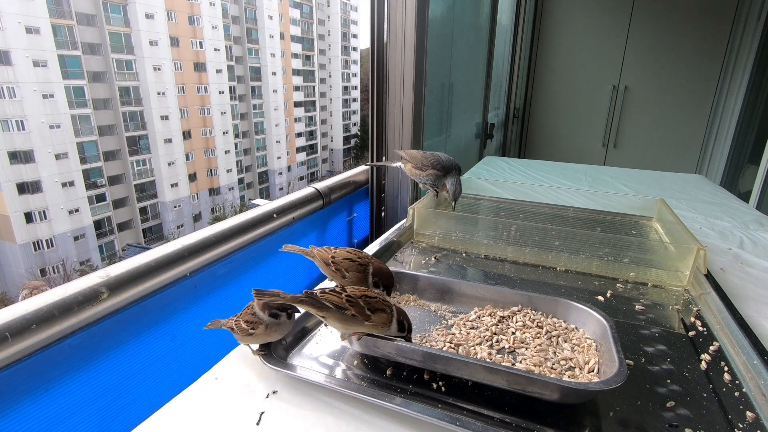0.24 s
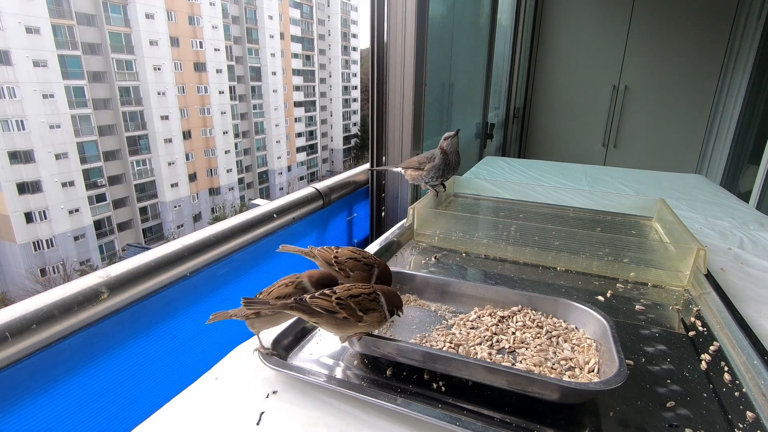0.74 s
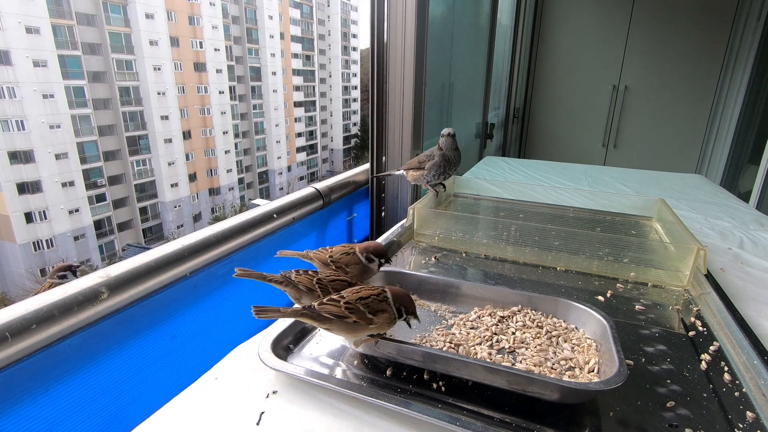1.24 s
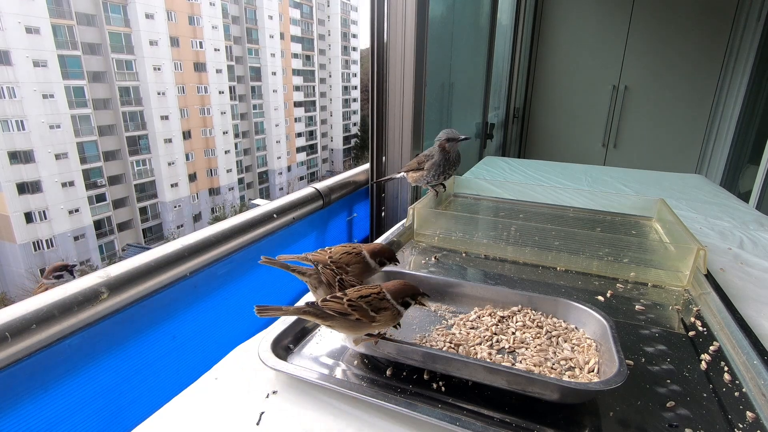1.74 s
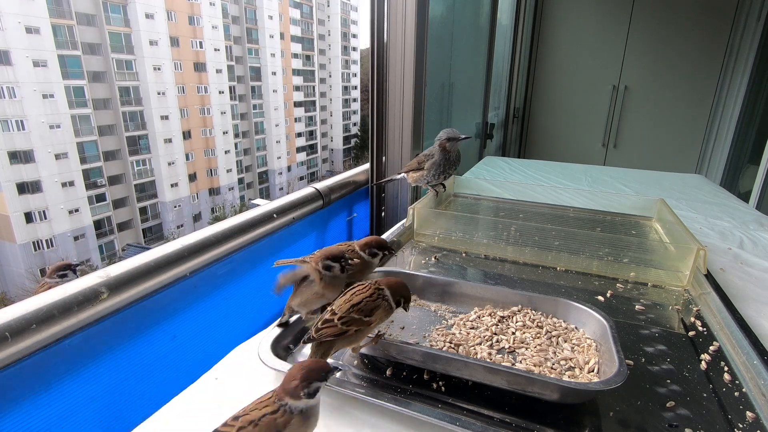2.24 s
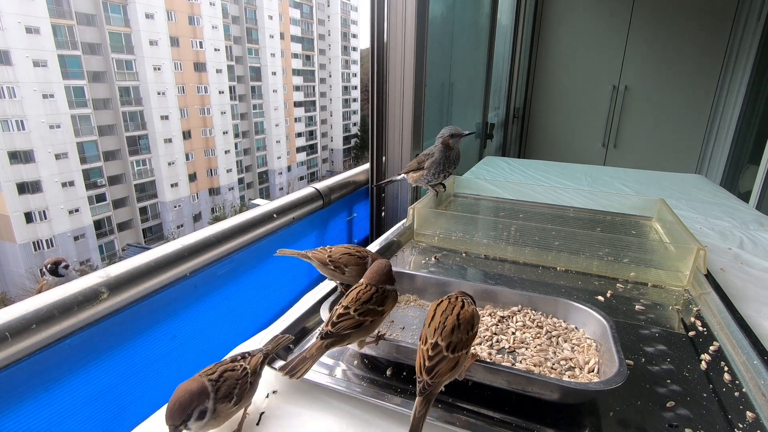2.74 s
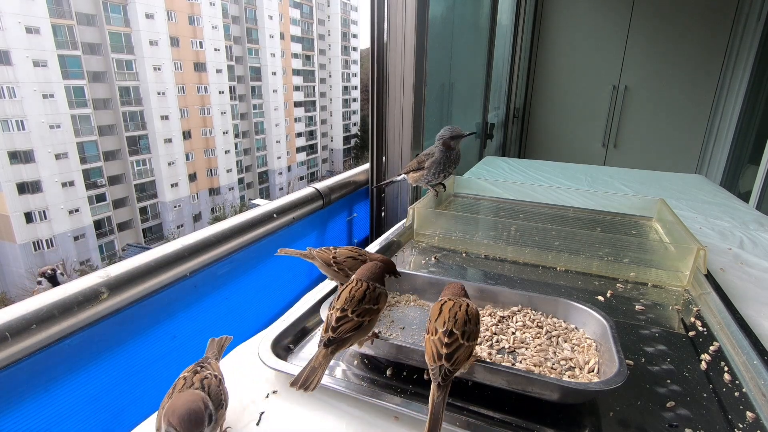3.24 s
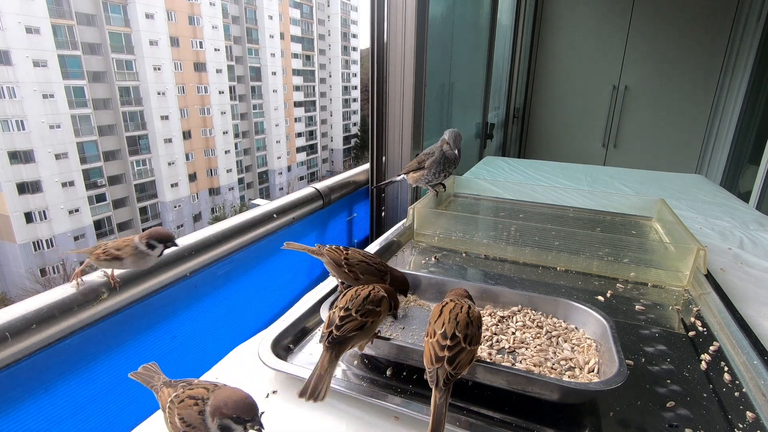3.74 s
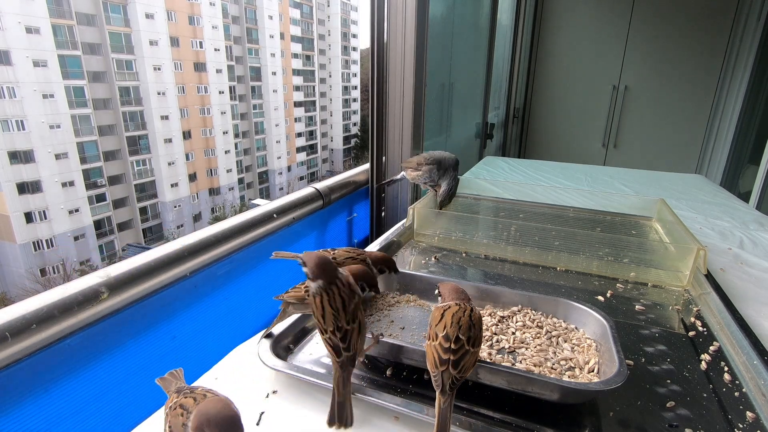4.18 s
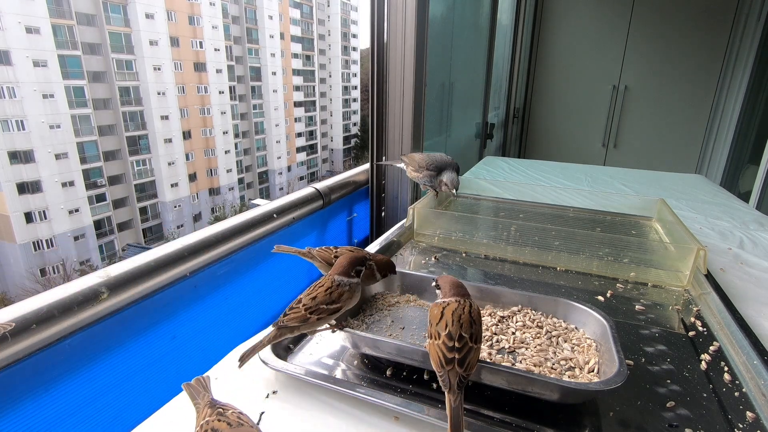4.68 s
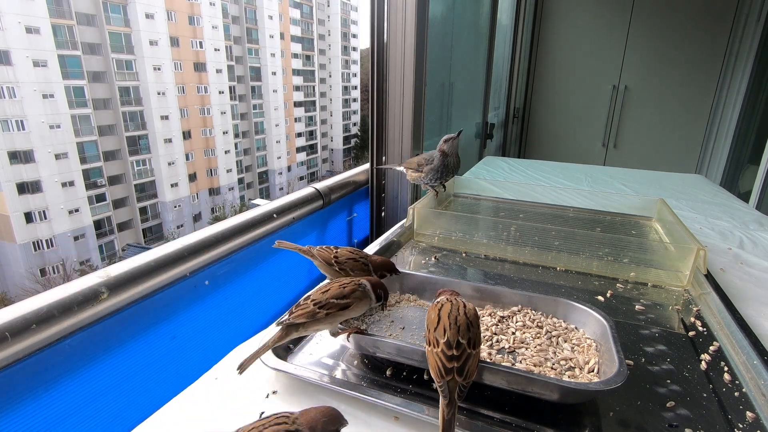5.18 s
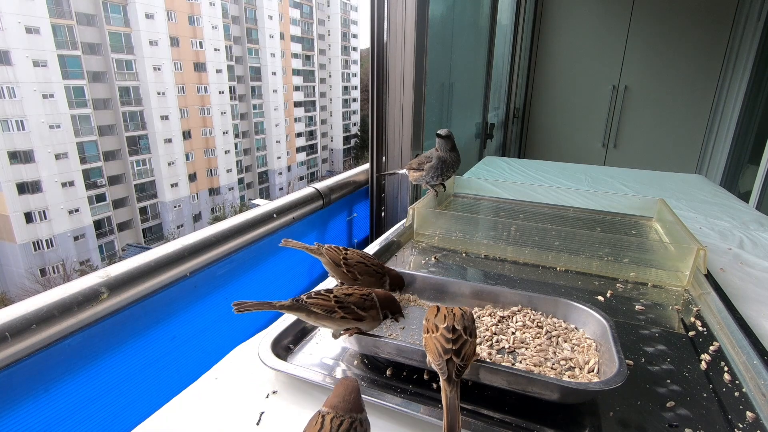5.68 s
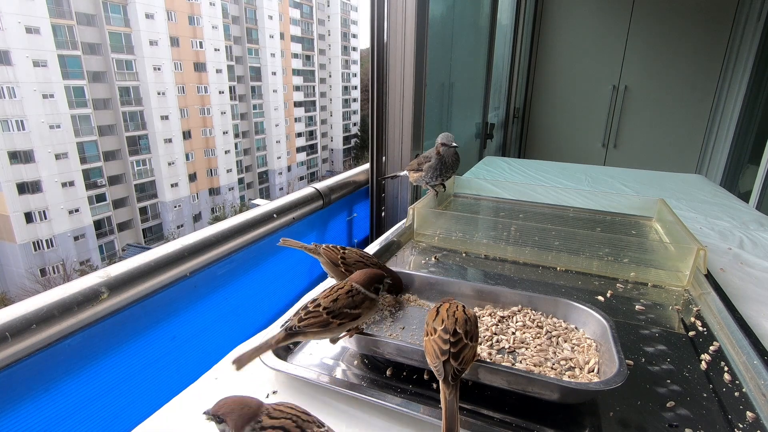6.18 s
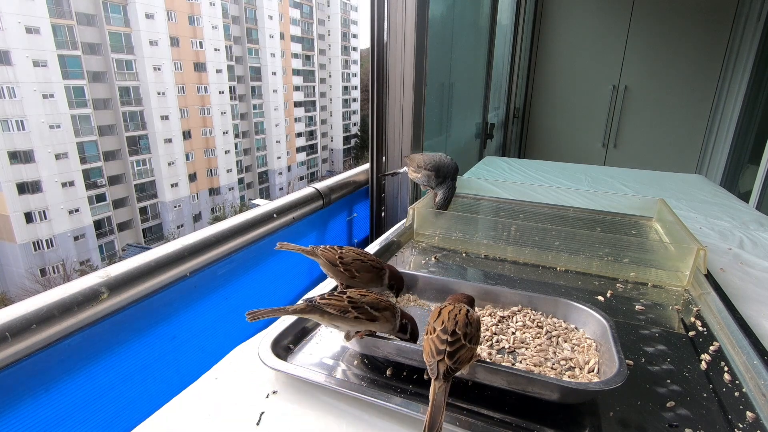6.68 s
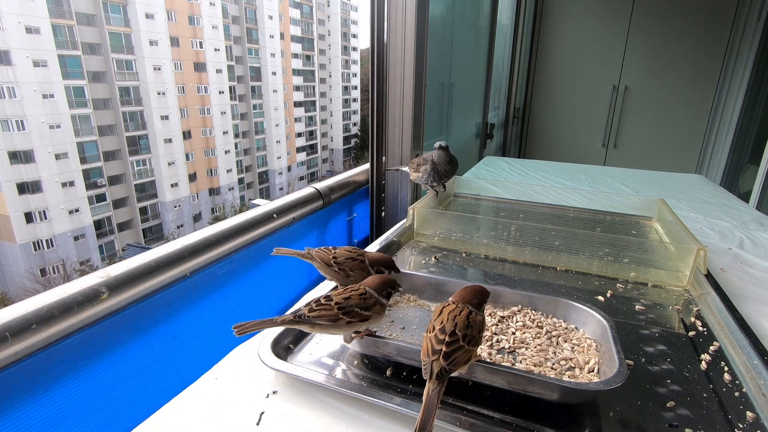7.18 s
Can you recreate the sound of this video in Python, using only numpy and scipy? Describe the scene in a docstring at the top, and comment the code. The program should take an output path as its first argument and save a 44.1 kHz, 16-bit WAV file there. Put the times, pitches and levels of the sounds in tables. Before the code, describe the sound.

On a glazed balcony, beaks tick irregularly on a metal seed tray, with faint husk rustles and scuffing claws. A flutter opens the scene, a heavy hop lands around two seconds, and a brief rattling bird call follows. Around four seconds, wing puffs, scrabbling and thumps cluster, then a thin metal ring. Pecks and hops continue to the end over quiet low town noise, closely miked.

```python
"""Sparrows at a steel seed tray.

Birds feed on a glazed balcony, close to a small camera on the same shelf. Beak and claw ticks are grainy
noise through short resonances, echoed by a decaying noise tail. Hops boom as shelf modes and knock as noise;
wings puff air as short pressure swings. The rim sings in sines, one bird churrs in sine pulses, and
coloured noise makes the scuffs, the town hum and a passing drone."""
import sys
import numpy as np
from scipy import signal
from scipy.fft import rfft, irfft, next_fast_len
from scipy.io import wavfile
from scipy.ndimage import uniform_filter1d, map_coordinates

SR = 44100
rng = np.random.default_rng(int(sys.argv[2]) if len(sys.argv) > 2 else 0)


def materialize(psi):
    """Save the field psi as 16-bit PCM at rate SR to the path in sys.argv[1].

    A 1-D psi becomes a single channel; in a 2-D psi each row is a channel.
    """
    bounded = np.clip(np.atleast_2d(psi).T, -1, 1)
    quanta = np.round(bounded * 32767).astype(np.int16)
    wavfile.write(sys.argv[1], SR, quanta)


N = 327222
TIME_S = np.arange(N) / SR
SHORT_S = TIME_S[:SR]

# Clear ticks on the steel: beak strikes, plus the low knock of the landing at 4.36 s and a # claw of the
# landing near 5.96 s. Each row: time in seconds, level before panning in dB, # main resonance in Hz, second
# resonance in Hz, second against main in dB, crisp top in dB.
CLEAR_STRIKES = [(0.0014, -24, 2020, 4540, 2, -23.5), (0.1335, -29.5, 1660, 2640, 6, -32),
                 (0.298, -38.5, 2900, 2090, -8, -27), (0.3645, -38.5, 5950, 4400, 2, -25),
                 (0.4804, -29.5, 3300, 6140, 5.5, -21), (0.9273, -34, 4600, 3220, -7, -20),
                 (0.9582, -30.5, 2020, 3200, -5, -26), (1.605, -39.5, 2860, 4530, -6, -28),
                 (1.8417, -27.5, 4330, 6300, -4, -22), (2.012, -34, 1890, 6300, -2, -34),
                 (2.0248, -36.5, 1440, 1950, 8, 11), (2.0415, -32, 5700, 2300, -4, -26),
                 (2.225, -45, 1520, 3230, -2, -38), (2.542, -38.5, 1440, 2190, -2, -23),
                 (2.6, -33, 5850, 4400, -10, -18.5), (2.9181, -29, 4650, 6160, -13, -21),
                 (3.162, -43, 1820, 3050, -8, -30), (3.4503, -30, 3770, 5700, 4, -20),
                 (3.645, -39, 5600, 3540, -4, -23), (3.8322, -41, 6400, 7300, -3, -14),
                 (3.8382, -29, 5940, 4370, -13, -24), (3.8737, -38, 6000, 3180, -4, -11),
                 (3.897, -26, 3130, 3640, -11, -21), (3.905, -38, 3500, 4300, -1, -23),
                 (3.9835, -42, 3200, 5000, -10, -25), (4.114, -42, 3080, 5990, -1, -15),
                 (4.213, -40.5, 5850, 3210, -10, -5), (4.2776, -35, 5700, 3550, -2, -15),
                 (4.2955, -31.5, 1710, 3200, -3, -25), (4.3433, -23, 3230, 2670, -6, -32),
                 (4.364, -45, 630, 426, -9, -33), (4.387, -34.5, 5700, 3150, 0, -11),
                 (4.653, -39, 5570, 3800, -12, -25), (5.017, -37, 6000, 4370, -10, -18),
                 (5.3731, -29.5, 5650, 3900, -11, -28), (5.673, -42, 4700, 5930, -9, -30),
                 (5.9645, -41, 1605, 3150, -4, -48), (6.033, -43, 5760, 4030, -3, -21),
                 (6.0859, -32.5, 2940, 5700, -4.5, -17), (6.1445, -35, 5450, 3800, -2, -25),
                 (6.2354, -31, 6040, 3020, -10, -10), (6.534, -43, 3120, 5400, 15, -18),
                 (6.6373, -31, 4730, 2150, -0.5, -23), (6.717, -32, 5730, 4530, -8, -33),
                 (6.7327, -37.5, 3140, 2300, -5, -34), (6.9241, -34, 4880, 3020, -2, -23),
                 (7.0465, -37, 5900, 4040, -17, -19)]
# Hops on the shelf. Each row: time in seconds, boom in dB and knock in dB before the port gains.
SHELF_HOPS = [(0.137, -16.5, -25.5), (0.364, -24, -35), (1.59, -50, -48), (2.019, -14, -14.5),
              (2.145, -22, -35), (2.364, -26, -49), (2.545, -25.5, -41), (2.662, -22.5, -39),
              (2.823, -31, -38), (3.366, -25.5, -29), (3.878, -24.5, -28), (3.935, -15.5, -27),
              (4.23, -20.5, -27), (4.363, -16.5, -19.5), (4.966, -25.5, -30.5), (5.187, -22, -30.5),
              (5.329, -30, -32), (5.385, -23, -29), (5.959, -17.5, -19.5), (6.249, -24, -24),
              (6.328, -13.5, -16.5), (6.506, -19.5, -30), (6.538, -16, -33.5), (6.737, -15.5, -30),
              (7.104, -22.5, -29.5), (7.173, -21, -33)]
# Shelf modes. Each row: frequency in Hz, mean level in dB, t60 in seconds.
SHELF_MODES = [(88, -16, 0.3), (160.2, -12, 0.23), (176.75, -8, 0.25), (214.7, 9.5, 0.036),
               (275.4, -10, 0.11)]
# Claws sliding on the tray rim. Each row: start in seconds, ring level in dB, pitch in Hz,
# slide length in seconds, t60 of the free ring in seconds, low mode against main in dB.
RIM_SLIDES = [(1.253, -52, 6325, .045, .25, -12), (3.56, -60, 6290, .1, .4, -14),
              (4.425, -42.5, 6267, .028, .52, -22)]
# Tray modes before seed damping. Each row: frequency in Hz, mean level in dB, t60 in seconds.
TRAY_MODES = [(1565, -7, 0.19), (2110, 1.5, 0.023), (2890, -18.5, 0.12), (3220, -1, 0.045),
              (3990, -8.5, 0.088), (4700, -6.5, 0.018), (5910, 4, 0.033)]
# Notes of the churr. Each row: start in seconds, length in seconds, pulses per second, mean pitch in Hz,
# level before the throat filter in dB.
CHURR_NOTES = [(2.255, .058, 156, 1790, -43.5), (2.365, .004, 225, 1600, -39),
               (2.383, .006, 304, 1480, -34)]
# Background level. Each row: time in seconds, gain in dB.
TOWN_LEVEL = [(0.0, -25), (0.29, -34.5), (1.07, -34), (1.92, -31), (2.35, -41.5), (3.22, -38),
              (3.37, -38.5), (4.15, -33), (4.4, -39.5), (4.59, -42.5), (4.75, -42), (5.33, -37.5),
              (5.68, -40), (6.72, -34), (7.03, -36), (7.42, -35.5)]
# Noise spectra, relative. Each row: frequency in Hz, density in dB per Hz.
HUM_SPECTRUM = [(20, -9), (50, 2), (80, -8), (120, -6), (155, -1), (180, 3), (215, -2.5), (280, -8.5),
                (400, -18.5), (700, -35.5), (2000, -75.5)]
TRAFFIC_SPECTRUM = [(100, -37), (330, 5), (540, -7.5), (760, -3), (1000, -13), (1400, -10), (2300, -24.5),
                    (9000, -56.5)]
RUSTLE_SPECTRUM = [(800, -5), (2000, 3), (3300, 4), (4600, 1), (6400, 1), (8300, -8), (13000, -10),
                   (16000, -53)]
# Colour of the balcony tail. Each row: frequency in Hz, density in dB per Hz.
ECHO_SPECTRUM = [(100, -29), (1500, 1.5), (3000, -2.5), (4500, -8), (6000, 1.5), (7500, 0), (9000, -2.5),
                 (15000, -15.5)]
# Thud and clatter of the tray under a landing, relative. Each row: frequency in Hz, density in dB per Hz.
THUD_SPECTRUM = [(150, -26.5), (290, 9), (420, 3.5), (700, -5), (1050, -13.5), (1700, -10.5), (3000, -20),
                 (7500, -29.5), (12000, -63)]
# Feet and feathers scuffing over seeds and steel. Each row: start in seconds, level in dB, centre in Hz,
# loss in dB per octave off centre (up to two octaves), fade time constant in seconds.
SCUFF_EVENTS = [(0.0, -43.5, 3500, 10, 0.052), (0.142, -52.5, 2720, 39, 0.2), (0.705, -41, 3000, 2, 0.087),
                (0.862, -48, 4900, 0.5, 0.1), (1.70, -49, 6700, 14, 0.093), (3.656, -56, 2530, 15, 0.099),
                (3.83, -44, 7300, 6, 0.043), (3.901, -46.5, 3300, 27, 0.061), (4.132, -51, 1950, -3, 0.24),
                (4.455, -50, 1030, 39, 0.02), (5.365, -42.5, 4000, 1.5, 0.055),
                (5.672, -48.5, 5400, 6, 0.048), (6.649, -56.5, 4230, 1.5, 0.93)]
# Short flutters. Each row: strongest downstroke in seconds, puff level before panning in dB,
# time to fall to 1/e on either side in seconds.
WING_FLUTTERS = [(0.129, -27.5, 0.023), (3.939, -20, 0.084), (4.313, -17.5, 0.043), (4.524, -23.5, 0.065)]
# Claws scrabbling among the seeds. Each row: start in seconds, length in seconds, ceiling of the ticks in dB.
CLAW_SCRABBLES = [(3.842, .12, -43.5), (4.131, .27, -45.5), (6.45, .025, -35.5)]
# Filter curves. Each row: frequency in Hz, gain in dB.
PECK_TONE = [(400, -8.5), (1000, -11.0), (1900, -1.5), (4500, -1), (6900, -1.5)]
SCUFF_TONE = [(400, -30), (1100, 9.0), (6800, 4), (8600, -7.5), (15000, -20)]
KNOCK_TONE = [(100, -12.0), (280, 3.0), (560, -5.5), (950, -20.0), (1800, -28.5), (4000, -71.0)]
LEFT_PORT_TONE = [(80, 5.0), (170, -52.0), (300, -37), (600, 6)]
FEATHER_TONE = [(30, 6.0), (130, 4.5), (300, -17.5), (700, -38.0), (3000, -45.0), (12000, -65.0)]
THROAT_TONE = [(1000, -19), (1450, -6), (2100, -2), (3200, 1), (6000, -37)]
DRONE_TONE = [(250, -40), (380, 9.0), (440, -7.0), (590, -7.0), (720, -31), (1500, -69)]

HUM_DB, TRAFFIC_DB, RUSTLE_DB = 1.5, -10, -24.5  # shares of the background, before drift and panning
# strike: crack against main resonance, resonance Q, share of the resonances in the echo
CRACK_DB, STRIKE_Q, RESONANCE_ECHO_DB = -4.5, 7.5, -12
TRAY_RING_DB, TRAY_DAMPING_S = -13.5, 0.018  # the seeds soon damp the tray
SOFT_TOP_DB = -21.5  # crisp top of nibbles and claws
PORT_LAG_S = 0.00002  # ticks reach the left port first
# faint husking; scrabbling shares the pitch range
NIBBLES_PER_S, NIBBLE_DB, NIBBLE_LOW_HZ, NIBBLE_HIGH_HZ = 2.4, -52, 1550, 6370
SCRABBLE_PER_S, SCRABBLE_RANGE_DB = 70, 21
# both feet around each landing: first foot's lead, second foot's lag, level against the boom, pitch
CLAW_LEAD_S, CLAW_LAG_S, CLAW_DB, CLAW_HZ = 0.0053, 0.006, -27, 1720
THUD_DB, THUD_FADE_S, THUD_LAG_S = -11, 0.0075, 0.00194  # level against the knock
BALCONY_T60_S, BALCONY_DB = 0.6, 2
WINGBEAT_HZ, NOMINAL_PUFF_HZ = 23.8, 54.6
RIM_LOW_HZ, RIM_WAVER_RAD, RIM_CHATTER_DB = 3365, 0.8, 3
TOP_HZ = 15800


def undb(db):
    """Decibels to gain."""
    return 10 ** (np.asarray(db) / 20)


def unit(x):
    """Scale to rms 1."""
    return x / np.sqrt(np.mean(x ** 2))


def crest(x, size):
    """Largest rms over any stretch of size samples."""
    return np.sqrt(uniform_filter1d(x ** 2, size, mode="constant").max())


def pan(db):
    """Left and right gains for a left-to-right level difference."""
    return undb(np.array([[db], [-db]]) / 2)


def add(out, start_s, x):
    """Mix x into out from start_s on."""
    i = max(int(start_s * SR), 0)
    out[..., i:i + x.shape[-1]] += x[..., :max(N - i, 0)]


def colour(x, points):
    """Causal minimum-phase filter through (Hz, dB) points."""
    size = next_fast_len(x.shape[-1] + 2048, True)
    hz, db = np.transpose(points)
    bins_hz = np.fft.rfftfreq(size, 1 / SR)
    gain = undb(np.interp(np.log(bins_hz + 1), np.log(hz), db))
    # fold the cepstrum onto positive time
    cepstrum = irfft(np.log(gain), size)
    cepstrum[1:size // 2] *= 2
    cepstrum[size // 2 + 1:] = 0
    response = np.exp(rfft(cepstrum))
    return irfft(rfft(x, size) * response, size)[..., :x.shape[-1]]


def walk(steps_per_s):
    """Smoothed random drift of about unit rms."""
    size = int(SR / steps_per_s)
    steps = np.repeat(rng.standard_normal(N // size + 1), size)
    smooth = uniform_filter1d(uniform_filter1d(steps, size), size)
    return unit(smooth[:N])


def pair(correlation, size):
    """Left and right noise with a given correlation."""
    mid, side = rng.standard_normal((2, size))
    c = np.clip(correlation, -1, 1)
    return (np.sqrt(1 + c) * mid + np.sqrt(1 - c) * side * np.array([[1], [-1]])) / np.sqrt(2)


def ring(modes, scatter_db, detune, waver_rad=0, size=SR):
    """Decaying modes; each blow shares its energy differently, and a moving contact makes them waver."""
    hz, db, t60_s = np.transpose(modes)[:, :, None]
    t = SHORT_S[:size]
    share, shift = rng.standard_normal((2, len(modes), 1))
    drift = waver_rad * np.array([walk(90)[:size] for _ in modes]) if waver_rad else 0
    waves = np.sin(2 * np.pi * hz * (1 + detune * shift) * t + drift)
    decay = np.exp(-np.log(1000) * t / t60_s)
    return np.sum(undb(db + scatter_db * share) * waves * decay, axis=0)


def town():
    """Low hum caught in the balcony, traffic beyond, and a rustle of husks; all rise and fall together."""
    level_db = np.interp(TIME_S, *np.transpose(TOWN_LEVEL))
    hum = unit(colour(pair(0.66, N), HUM_SPECTRUM)) * undb(HUM_DB + 2.2 * walk(10)) * pan(-5.0)
    traffic = unit(colour(pair(-0.49, N), TRAFFIC_SPECTRUM))
    traffic = traffic * undb(TRAFFIC_DB + 0.11 * walk(4.7)) * pan(-0.41)
    crackle = (rng.random(N) < 60 / SR) * rng.standard_normal(N)  # about 60 clicks per s
    hiss = pair(0.24, N) + undb(-29.0) * unit(crackle)
    rustle = unit(colour(hiss, RUSTLE_SPECTRUM)) * undb(RUSTLE_DB)
    return (hum + traffic + rustle) * undb(level_db)


def scuffs():
    """Dense little slips that fade away and keep the tray humming in faint, broken bands."""
    out = np.zeros((2, N))
    for start_s, db, hz, loss_db, fade_s in SCUFF_EVENTS:
        tray = ring(TRAY_MODES, scatter_db=-2, detune=0.0091, waver_rad=0.89)
        tray /= np.linalg.norm(tray)
        grain = undb(3.3 * walk(500)[:SR])
        envelope = (1 - np.exp(-SHORT_S / 0.0063)) * np.exp(-SHORT_S / fade_s)
        slips = pair(0.53, SR) * grain * envelope
        slips = slips + undb(-7.5) * signal.fftconvolve(slips, tray[None], axes=1)[:, :SR]
        slips = colour(slips, [(hz / 4, -2 * loss_db), (hz, 0), (hz * 4, -2 * loss_db)])
        slips = colour(slips, SCUFF_TONE)
        add(out, start_s, slips / crest(slips[0], size=1024) * undb(db))
    return out


def strikes():
    """Every tick on the steel: clear strikes, the claws of each hop, scrabbling, and random faint nibbles."""
    claws = [(s + offset_s, db + CLAW_DB, CLAW_HZ, 2 * CLAW_HZ, 0, SOFT_TOP_DB)
             for s, db, _ in SHELF_HOPS for offset_s in (-CLAW_LEAD_S, CLAW_LAG_S)]
    small = [((k + rng.random()) / NIBBLES_PER_S, NIBBLE_DB) for k in range(int(NIBBLES_PER_S * N / SR))]
    small += [(s + (k + rng.random()) / SCRABBLE_PER_S, db - SCRABBLE_RANGE_DB * rng.random())
              for s, length_s, db in CLAW_SCRABBLES for k in range(round(length_s * SCRABBLE_PER_S))]
    spots_hz = NIBBLE_LOW_HZ * (NIBBLE_HIGH_HZ / NIBBLE_LOW_HZ) ** rng.random((len(small), 2))
    soft = [(s, db, *spot_hz, 0, SOFT_TOP_DB) for (s, db), spot_hz in zip(small, spots_hz)]
    return list(CLEAR_STRIKES) + claws + soft


def resonate(x, hz):
    """Short resonance, scaled to the same peak rms at any pitch."""
    y = signal.lfilter(*signal.iirpeak(hz, STRIKE_Q, fs=SR), x)
    return y / crest(y.mean(0), size=64)


def pecks():
    """Graze, crack, brief tray ring and settling husks; returns the near sound and what reaches the walls."""
    near, spread, t = np.zeros((2, N)), np.zeros((2, N)), SHORT_S[:SR // 12]
    lead_s = SHORT_S[220]
    # a light graze comes just ahead of the main contact
    contact = np.where(t < lead_s, undb(-21.0), np.exp(-np.abs(t - lead_s) / 0.0017))
    settling = undb(-20.5) * np.exp(-t / 0.042) * (t > lead_s)
    for start_s, db, hz, second_hz, second_db, top_db in strikes():
        # the husk gives way in tiny uneven steps
        steps = np.repeat(rng.exponential(size=len(t)), repeats=16)[:len(t)]
        grain = undb(4.23 * steps.clip(max=4))
        tick = pair(0.78, len(t)) * grain * (contact + settling)
        tick = colour(tick, PECK_TONE + [(8500, top_db + 10.5), (14000, top_db + 4)])
        crack = undb(CRACK_DB) * tick / crest(tick.mean(0), size=64)
        # each spot on the steel brings out its own pair of resonances
        tones = resonate(tick, hz) + undb(second_db) * resonate(tick, second_hz)
        modes = ring(TRAY_MODES, scatter_db=4, detune=0.015, size=len(t)) * np.exp(-t / TRAY_DAMPING_S)
        steel = signal.fftconvolve(tick, modes[None], axes=1)[:, :len(t)]
        tones = tones + undb(TRAY_RING_DB) * steel / crest(steel.mean(0), size=64)
        gain = undb(db) / crest((crack + tones).mean(0), size=64)
        add(near, start_s + 0.0005 - lead_s, gain * (crack + tones))
        to_walls = undb(2.0) * crack + undb(RESONANCE_ECHO_DB) * tones
        add(spread, start_s + 0.0006 - lead_s, gain * to_walls)
    near[1] = map_coordinates(near[1], [(TIME_S - PORT_LAG_S) * SR], order=3)
    return near * pan(-1.7), spread * pan(-0.16)


def balcony(x):
    """An early bounce off the glass, then the decaying tail between the hard walls."""
    decay = np.exp(-np.log(1000) * SHORT_S / BALCONY_T60_S)
    tail = rng.standard_normal((2, SR)) * decay * (1 - np.exp(-SHORT_S / 0.00082))
    response = colour(unit(tail), ECHO_SPECTRUM) / np.sqrt(SR) * undb(BALCONY_DB)
    response[:, int(0.0063 * SR)] += 0.28
    return signal.fftconvolve(x, response, axes=1)[:, :N]


def wings():
    """Each downstroke swings the pressure at the ports, with a swish of feathers; beats swell and die away."""
    puffs, swish = np.zeros(N), np.zeros(N)
    beats_s = np.arange(-2, 4) / WINGBEAT_HZ
    for strongest_s, db, spread_s in WING_FLUTTERS:
        gains = undb(db) * np.exp(-(beats_s / spread_s) ** 2)
        for beat_s, gain in zip(strongest_s + beats_s, gains):
            # no two strokes are equally quick
            puff_hz = NOMINAL_PUFF_HZ * np.exp(0.65 * rng.uniform(-0.83, 1))
            turn = (TIME_S - beat_s) * puff_hz
            near = np.abs(turn) < 2
            puffs[near] -= gain * np.exp(-(turn[near] / 0.5) ** 2) * np.cos(2 * np.pi * turn[near])
            swish[near] += gain * np.exp(-((TIME_S[near] - beat_s) / 0.025) ** 2)
    feathers = unit(colour(pair(0.08, N), FEATHER_TONE))
    return puffs * pan(-22.0) + feathers * swish * undb(-1.0) * pan(-6.0)


def hops():
    """Feet push the shelf, which booms through the camera mount and knocks in the air."""
    boom, knock, thuds = np.zeros(N), np.zeros((2, N)), np.zeros((2, N))
    landing = 1 - np.exp(-(SHORT_S / 0.007) ** 2)  # the legs take the weight gradually
    t = SHORT_S[:SR // 4]
    for start_s, boom_db, knock_db in SHELF_HOPS:
        body = ring(SHELF_MODES, scatter_db=2.5, detune=0.02) * landing
        add(boom, start_s, body / crest(body, size=256) * undb(boom_db))
        # the shelf rocks the camera, so the two ports move against each other
        tap = colour(pair(-0.82, len(t)) * np.exp(-t / 0.018), KNOCK_TONE)
        add(knock, start_s, tap / crest(tap[0], size=256) * undb(knock_db))
        thud = colour(pair(0.29, len(t)) * np.exp(-t / THUD_FADE_S), THUD_SPECTRUM)
        add(thuds, start_s + THUD_LAG_S, thud / crest(thud[0], size=256) * undb(knock_db + THUD_DB))
    # the right port is the more firmly coupled to the shelf
    left = colour(boom, LEFT_PORT_TONE)
    sway = np.imag(signal.hilbert(boom))  # boom shifted a quarter cycle
    return np.array([left + 0.47 * sway, boom * undb(5.5)]) + (knock + thuds) * pan(-4.4)


def rim():
    """A sliding claw makes the rim sing, wavering and chattering; let go, the tone steadies as it decays."""
    out = np.zeros((2, N))
    for start_s, db, hz, slide_s, t60_s, low_db in RIM_SLIDES:
        sliding = np.exp(-(SHORT_S / slide_s / 2) ** 2)
        bend = RIM_WAVER_RAD * sliding * walk(400)[:SR]
        song = np.sin(2 * np.pi * hz * SHORT_S + bend)
        song += undb(low_db) * np.sin(2 * np.pi * RIM_LOW_HZ * SHORT_S + bend)
        decay = np.exp(-np.log(1000) * np.maximum(SHORT_S - slide_s, 0) / t60_s)
        level = undb(db) * (1 - np.exp(-SHORT_S / 0.003)) * decay
        for port in out:
            chatter = undb(RIM_CHATTER_DB * sliding * walk(200)[:SR])
            add(port, start_s, song * level * chatter)
    return out


def churr():
    """A dry rattle of uneven throat pulses, then two lower, very short bursts, the last the loudest."""
    out, t = np.zeros(N), SHORT_S[:SR // 10]
    for start_s, length_s, pulses_per_s, hz, db in CHURR_NOTES:
        note = np.zeros(N)
        for pulse_s in np.arange(0, length_s, 1 / pulses_per_s):
            late, sharp, force = rng.standard_normal(3)
            pulse = np.sin(2 * np.pi * hz * (1 + 0.018 * sharp) * t)
            pulse *= (1 - np.exp(-t / 0.00032)) * np.exp(-t / 0.002)
            add(note, start_s + pulse_s + 0.22 * late / pulses_per_s, undb(2 * force) * pulse)
        out += note / crest(note, size=256) * undb(db)
    out = colour(out, THROAT_TONE)  # the throat dulls the rasp
    return np.array([out, out])


def drone():
    """A faint, far-off drone of narrow noise swells out of the town noise for a moment."""
    swell = np.exp(-((TIME_S - 3.2) / 0.29) ** 2)
    return unit(colour(pair(0.21, N), DRONE_TONE)) * swell * undb(-43.0)


def scene():
    """The birds and their echo over the town."""
    around = town() + scuffs() + wings() + hops() + rim() + drone()
    ticks, spread = pecks()
    call = churr()
    return around + ticks + call + balcony(spread + undb(-8) * call)


def record(dry):
    """The camera cuts the top with a steep elliptic low-pass."""
    return signal.sosfilt(signal.ellip(10, 0.2, 80, TOP_HZ, fs=SR, output="sos"), dry)


dry = scene()
out = record(dry)
materialize(out)
```